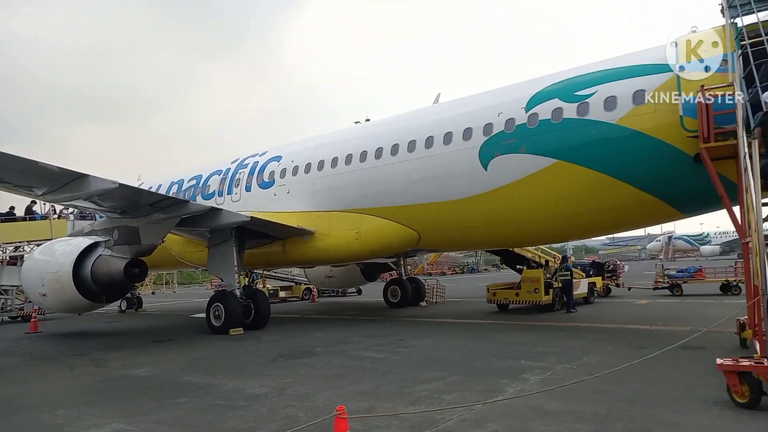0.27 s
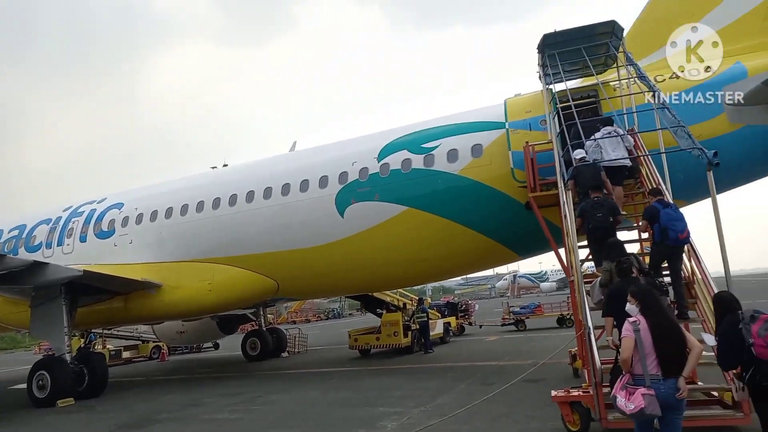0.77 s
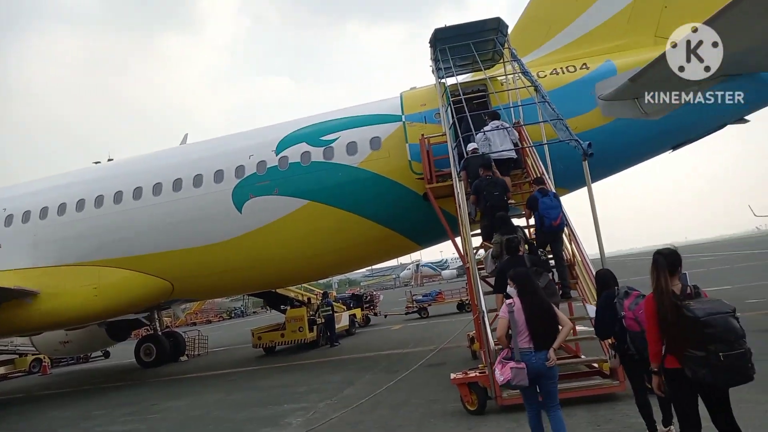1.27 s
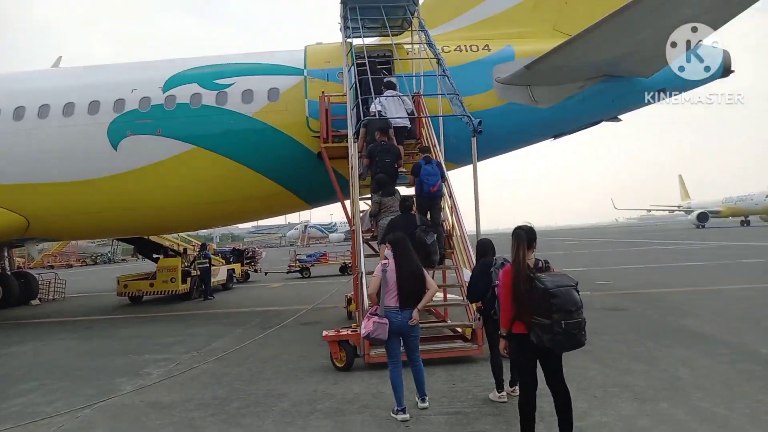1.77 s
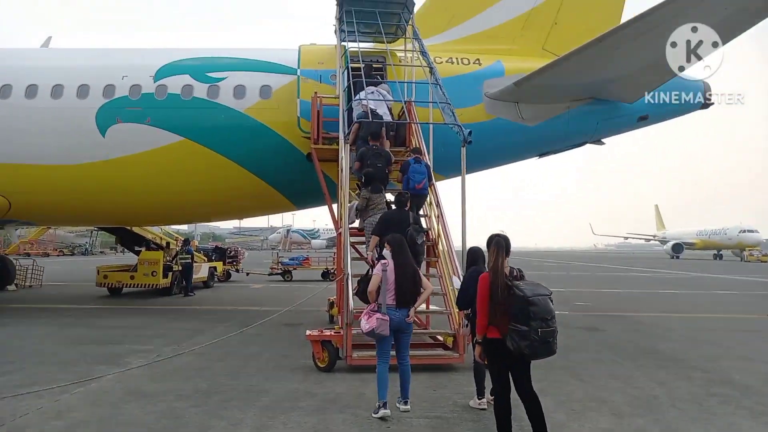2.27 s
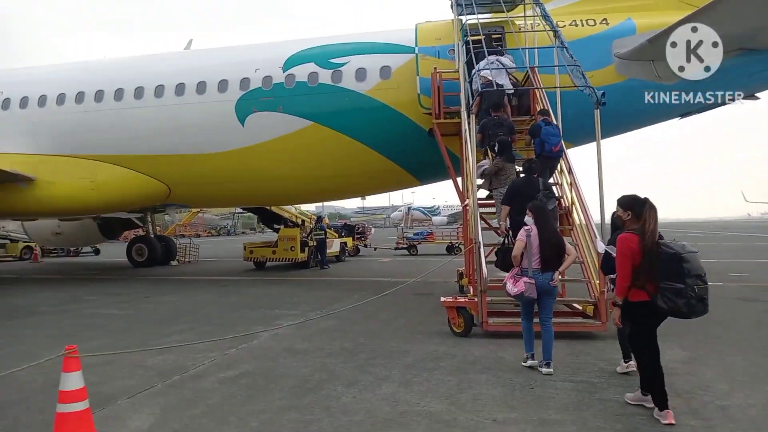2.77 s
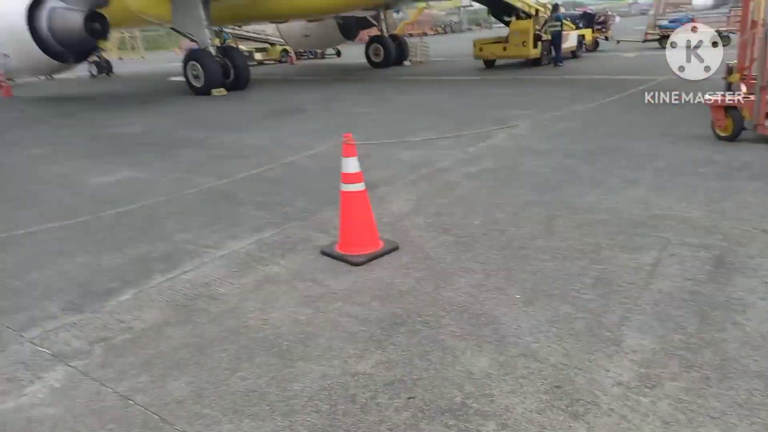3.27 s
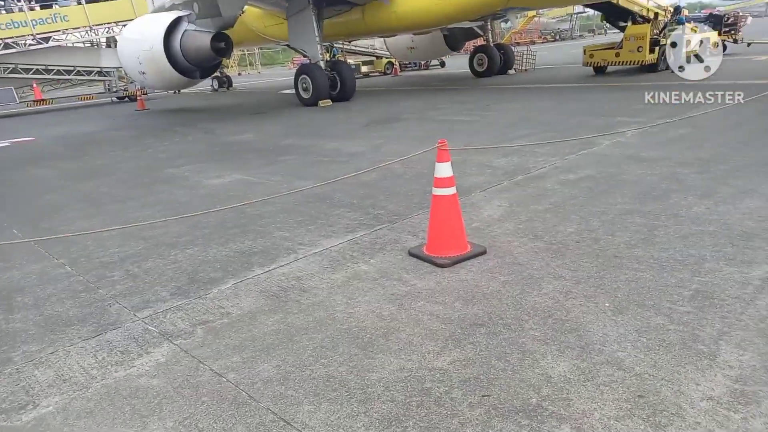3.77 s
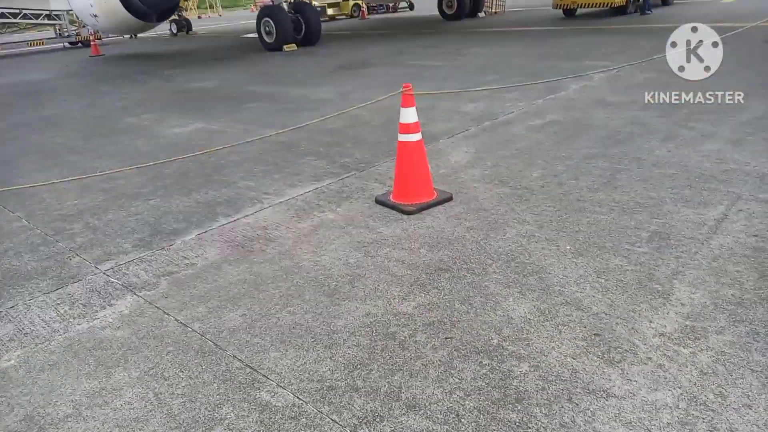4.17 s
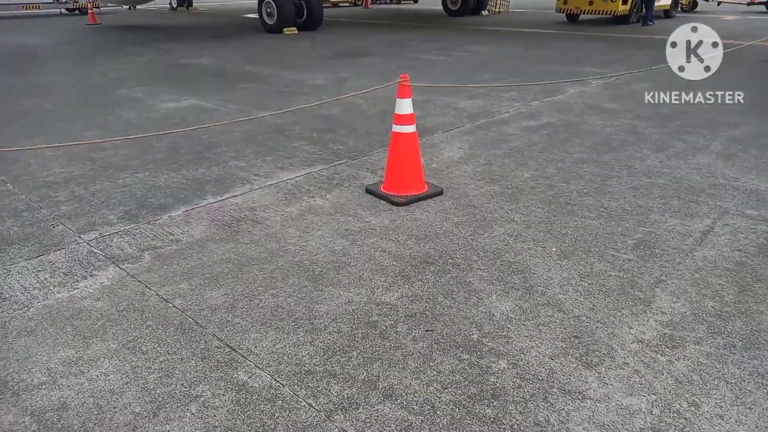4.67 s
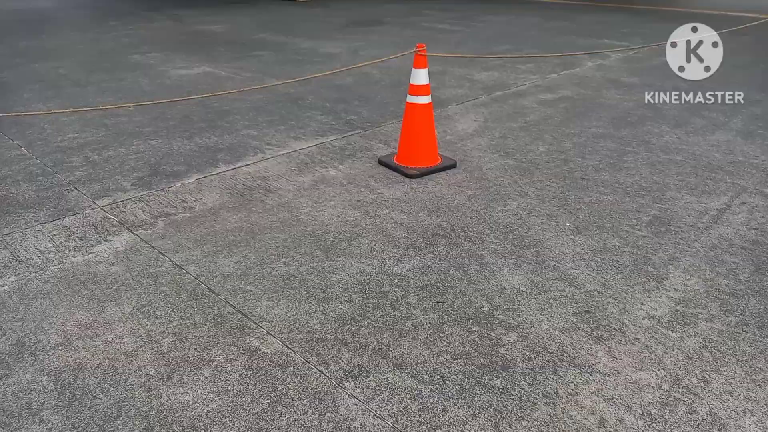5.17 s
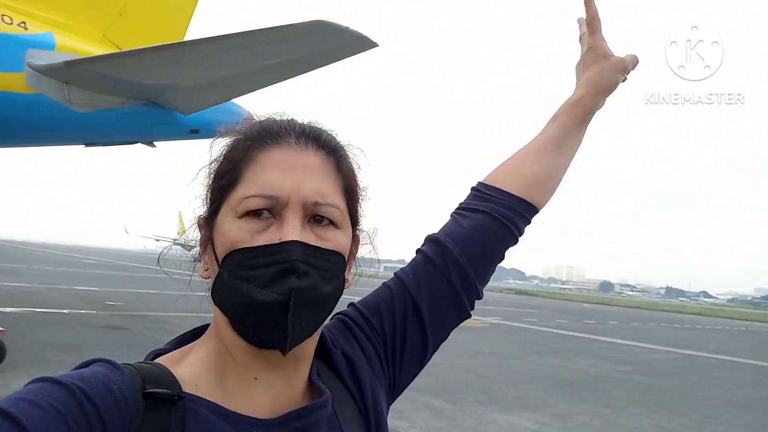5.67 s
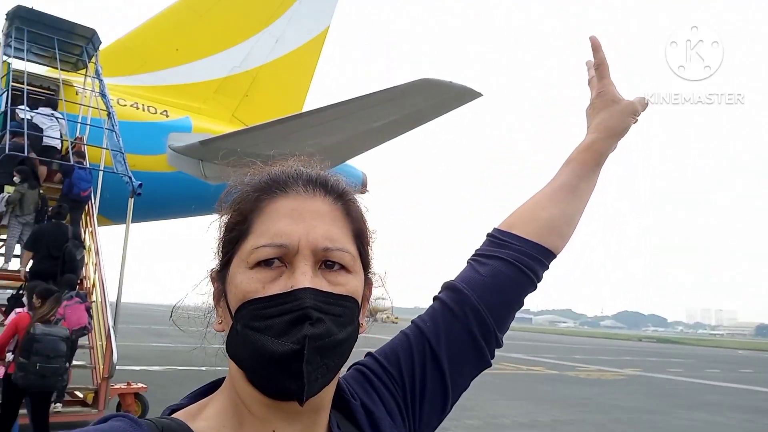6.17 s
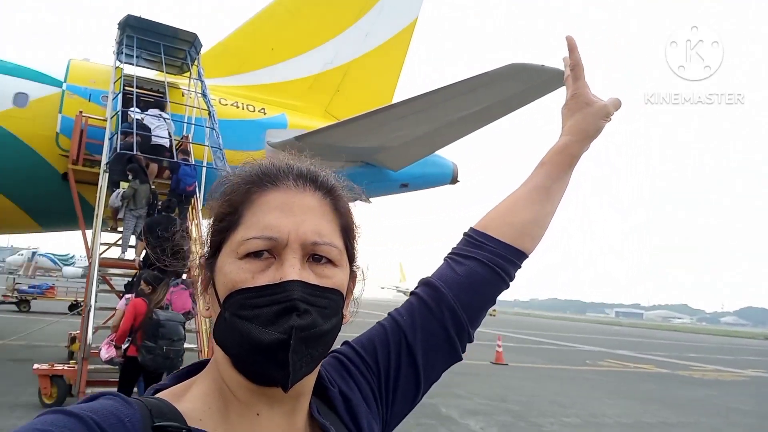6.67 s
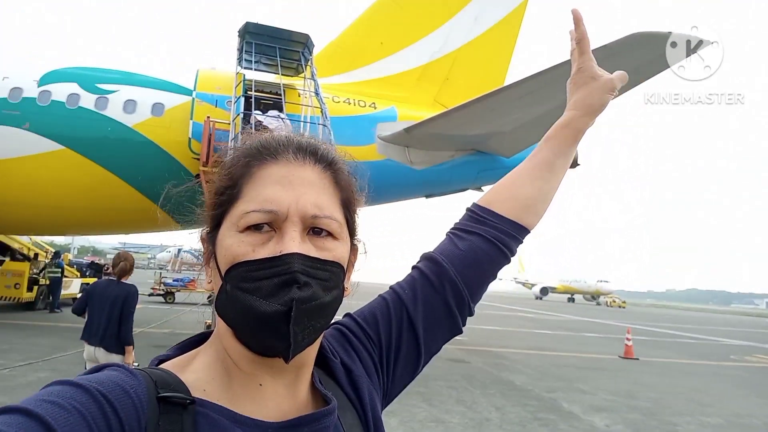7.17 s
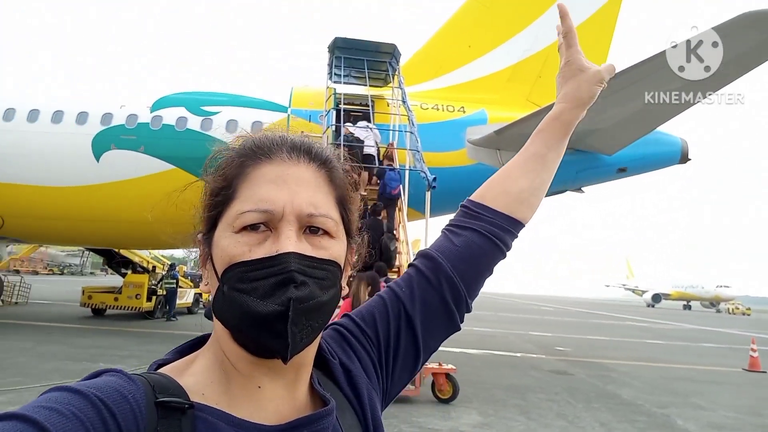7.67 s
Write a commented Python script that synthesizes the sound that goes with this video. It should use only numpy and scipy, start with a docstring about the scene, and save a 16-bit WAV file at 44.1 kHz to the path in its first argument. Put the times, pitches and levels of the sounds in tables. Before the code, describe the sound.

Outdoors on an airport apron, a handheld stereo microphone near a parked airliner's tail picks up a constant turbine roar: deep rumble, hollow exhaust rush, airy hiss and a very high whistle. Early wind gusts thump the left side. The vented air drops away as the camera tilts down, everything fades to silence for a moment, then the roar returns from the other side.

```python
"""A parked airliner's auxiliary turbine runs on an open apron, heard from a hand-held camera near the tail.
Filtered turbulence makes the combustion rumble, exhaust roar, hiss and vented air; listed gusts of random wind
noise buffet two ports. Lines broadened by random twinkling make a high compressor whistle, a fan's whine, shaft
orders, hums and low swells. Delays and balances move the sound between the ports as the camera turns.
It dips once, then fades out briefly and returns facing the other way."""
import sys
import numpy as np
from scipy import signal
from scipy.fft import rfft, irfft, next_fast_len
from scipy.io import wavfile
from scipy.ndimage import uniform_filter1d

SR = 44100
rng = np.random.default_rng(int(sys.argv[2]) if len(sys.argv) > 2 else 0)


def digitize_waveform(pressure):
    """Quantize a signal to 16-bit integers and store it at the path in sys.argv[1].

    Rows of a 2-D input are taken as channels; values are limited to [-1, 1].
    """
    field = np.atleast_2d(pressure).T
    bounded = np.clip(field, -1, 1)
    quanta = np.round(bounded * 32767).astype(np.int16)
    wavfile.write(sys.argv[1], SR, quanta)


N = 349272
TIME = np.arange(N) / SR


def gain_of(db):
    """Logarithmic level: decibels become an amplitude gain."""
    return 10 ** (np.asarray(db) / 20)


def evened(x):
    """Power normalisation: scales the whole signal to an rms of 1."""
    return x / np.sqrt(np.mean(abs(x) ** 2) + 1e-20)


def along(rows, t=TIME):
    """Linear interpolation: joins (time, value) rows by straight lines."""
    return np.interp(t, *np.transpose(rows))


def hump(peak_s, length_s):
    """Raised-cosine envelope: a smooth rise from 0 to 1 and back within the given length."""
    return np.cos(np.pi * np.clip((TIME - peak_s) / length_s, -.5, .5)) ** 2


def panned(balance_db):
    """Constant-power panning: left and right gains from the left-right balance."""
    pair = gain_of(np.array([[.5], [-.5]]) * balance_db)
    return pair / np.sqrt(np.mean(pair ** 2, axis=0))


# the camera swings from the aircraft down to the ground between the first two times, and faces round at the third
TILT_FROM_S, TILT_TO_S, TURN_S = 2.86, 3.69, 5.48


def poses():
    """Crossfade of viewpoints: shares of facing the aircraft, pointing down and turned round, over time."""
    tilt = along([(TILT_FROM_S, 0), (TILT_TO_S, 1)])
    turned = TIME >= TURN_S
    return np.array([(1 - tilt) * ~turned, tilt * ~turned, turned])


def by_pose(levels_db):
    """Directivity: blends a source's gains for the three poses over time."""
    return gain_of(levels_db) @ poses()


def drift(rate_hz):
    """Random modulation: low-passed complex noise of rms about 1, changing at about the given rate."""
    t = np.arange(0, N, 64) / SR
    f = np.fft.fftfreq(len(t), t[1])
    chance = rng.standard_normal(len(t)) + 1j * rng.standard_normal(len(t))
    slow = np.fft.ifft(chance / (1 + (f / rate_hz) ** 2) ** .7)
    return np.interp(TIME, t, evened(slow))


def tone(hz, width_hz, steady, lag_ms=0):
    """Scattering in hot air: a steady line plus a twinkling part that differs by port; the left can lag."""
    apart = np.clip(hz / 2500, 0, .8)  # short waves take more different paths
    own = np.array([drift(width_hz / 2), drift(width_hz / 2)])
    twinkle = np.sqrt(1 - apart) * drift(width_hz / 2) + np.sqrt(apart) * own
    strength = np.sqrt(steady) + np.sqrt(1 - steady) * twinkle  # steady is a share of power
    turns = np.cumsum(hz * np.ones(N)) / SR
    arrival = np.array([turns - hz * lag_ms / 1000, turns])
    return evened((strength * np.exp(2j * np.pi * arrival)).real)


def coloured(x, spectrum, resonances=()):
    """Spectral filtering: shapes noise on a log-frequency axis, adds resonances, and evens its power."""
    hz, db = np.transpose(spectrum)
    size = next_fast_len(N)
    f = np.fft.rfftfreq(size, 1 / SR)
    # silent outside the listed band
    shape_db = np.interp(np.log(f + 1), np.log(hz + 1), db, left=-np.inf, right=-np.inf)
    for centre_hz, width_hz, peak_db in resonances:
        shape_db = shape_db + peak_db / (1 + (2 * (f - centre_hz) / width_hz) ** 2)
    return evened(irfft(rfft(x, size) * gain_of(shape_db), size)[:, :N])


PORT_SPAN_MS = 0.34  # time sound takes from one port to the other
# Bearing of the turbine. Each row: time in seconds, delay of the left port in ms.
BEARING = [(0, 0.45), (1.2, 0.27), (2.2, 0.2), (2.8, 0.23), (3.6, 0.41), (5.45, 0.39), (5.5, -0.424),
           (6.2, -0.39), (7.2, -0.17), (7.9, -0.2)]


def rush(direct, patchy_db):
    """Diffuse-field coherence: turbulence from one bearing plus scatter from all round the apron."""
    size, hop = 1024, 256
    hz = np.fft.rfftfreq(size, 1 / SR)
    t = np.arange(N // hop + 5) * hop / SR
    grid = (3, len(t), len(hz))
    source, a, b = rng.standard_normal(grid) + 1j * rng.standard_normal(grid)
    lag_s = along(BEARING, t=t)[:, None] / 1000
    beam = np.array([source * np.exp(-2j * np.pi * hz * lag_s), source])
    alike = np.sinc(2 * hz * PORT_SPAN_MS / 1000)  # long waves reach both ports alike
    scatter = np.array([a, alike * a + np.sqrt(1 - alike ** 2) * b])
    field = np.sqrt(direct) * beam + np.sqrt(1 - direct) * scatter
    # moving hot air makes wide bands swell and sink together
    in_time = uniform_filter1d(rng.standard_normal(a.shape), size=16, axis=0)
    patches = uniform_filter1d(in_time, size=70, axis=1)
    field = field * gain_of(patchy_db * evened(patches))
    return signal.istft(field.transpose(0, 2, 1), nperseg=size, noverlap=size - hop)[1][:, :N]


# Combustion rumble spectrum. Each row: frequency in Hz, relative power density in dB.
RUMBLE = [(13, -61), (22, -27), (76, 1.5), (91, 0.5), (172, -6.5), (190, -7.5), (250, -22.5), (420, -120)]
# Rumble's relative levels: facing the aircraft in dB, pointing down in dB, turned round in dB.
RUMBLE_DB = (-29.5, -30, -27.5)
SWELL_DB, SWELL_HZ = -0.1, 1.5  # scale and rate of the random swelling


def rumble():
    """Combustion noise: low-frequency turbulence that swells and sinks slightly at random."""
    burning = coloured(rush(direct=0.53, patchy_db=-0.3), RUMBLE)
    swell = gain_of(SWELL_DB * drift(SWELL_HZ).real)
    return burning * swell * by_pose(RUMBLE_DB) * panned(-.6)


# Exhaust roar in the three poses. Each row: frequency in Hz, relative power density in dB.
ROAR_FACING = [(90, -20), (150, -4.5), (200, -2.5), (245, -4.5), (330, -0.5), (400, -2.5), (500, -2.5),
               (595, -10), (690, -10), (820, -6), (1030, -11), (1350, -10), (1550, -15.5), (2000, -18.5),
               (2700, -39.5)]
ROAR_DOWN = [(90, -23), (150, -3.5), (210, -0.5), (320, -1.5), (400, -2), (560, -4.5), (645, -8.5),
             (820, -9), (1100, -9.5), (1350, -8.5), (1650, -17), (2100, -22.5), (2800, -30)]
ROAR_BEHIND = [(90, 0), (150, -6), (220, -3), (345, 1), (430, -2), (510, -3), (630, -11), (820, -6),
               (950, -7.5), (1090, -12), (1220, -8.5), (1380, -9), (1470, -13.5), (1970, -16.5),
               (2200, -22), (2700, -26)]
# Narrow peaks and a notch of the exhaust pipe. Each row: frequency in Hz, width in Hz, change in dB.
PIPE = [(680, 31, 3.5), (1340, 29, 1.5), (1820, 62, -8.5), (1895, 100, 4)]
# Surges of the roar. Each row: peak time in seconds, length in seconds, boost in dB.
SURGES = [(4.01, .16, 1.5), (4.466, 0.17, 2.5), (6.785, 0.11, 1.5), (7.22, .14, 1)]
# Roar's relative levels: facing the aircraft in dB, pointing down in dB, turned round in dB.
ROAR_DB = (-24.5, -24, -22.5)


def roar():
    """Jet noise through a resonant pipe: turbulence whose colour depends on where the camera points."""
    jet = rush(direct=0.47, patchy_db=.5)
    views = zip(poses(), (ROAR_FACING, ROAR_DOWN, ROAR_BEHIND))
    blend = sum(share * coloured(jet, spectrum, PIPE) for share, spectrum in views)
    surge_db = sum(db * hump(peak_s, length_s) for peak_s, length_s, db in SURGES)
    return blend * gain_of(surge_db) * by_pose(ROAR_DB) * panned(-0.95)


# Broad hiss spectrum. Each row: frequency in Hz, relative power density in dB.
HISS = [(1300, -17), (1900, -2), (2900, 1.5), (3400, -1.5), (4900, -2), (5600, 0), (6600, -2),
        (7100, -10.5), (7500, -38), (8300, -7), (8900, -18), (9600, -11.5), (11000, -6.5), (15000, -5)]
# Course of the hiss. Each row: time in seconds, relative level in dB.
HISS_LEVEL = [(0, -30.5), (1.5, -31.5), (3.5, -30.5), (4.4, -28.5), (5.3, -30.5), (5.7, -34.5),
              (6.8, -32.5), (7.9, -29)]
# Left-right balance of the hiss: facing the aircraft in dB, pointing down in dB, turned round in dB.
HISS_BALANCE_DB = (-0.5, -.5, 2.5)
# Band shaded by the camera body, left port then right. Each row: frequency in Hz, width in Hz, change in dB.
PORT_SHADE = [(4300, 2000, -1), (7000, 1100, -6)]


def hiss():
    """Diffuse turbulence noise: fine hiss mostly from all round, with a band shaded at each port."""
    scatter = rush(direct=0.13, patchy_db=.7)
    shaded = [coloured(port[None], HISS, [shade]) for port, shade in zip(scatter, PORT_SHADE)]
    return np.vstack(shaded) * gain_of(along(HISS_LEVEL)) * panned(HISS_BALANCE_DB @ poses())


# Vented air before and after the camera turns. Each row: frequency in Hz, relative power density in dB.
VENT_FACING = [(900, -8.5), (1900, -11), (2700, -5), (3200, -5), (3800, 0.5), (5000, -0.5), (5500, 1.5),
               (5900, -9), (6500, -46), (7500, -47)]
VENT_BEHIND = [(900, -19), (1900, -9.5), (2400, -9), (2900, -8), (3350, -10), (3700, -1), (4300, -1.5),
               (4900, -4.5), (5500, -15.5), (6500, -35)]
# Vent's relative levels: facing the aircraft in dB, pointing down in dB, turned round in dB.
VENT_DB = (-24.5, -37, -25.5)
# Swelling as the camera pans across the vent's beam. Each row: time in seconds, change in dB.
VENT_SWELL = [(0, -0.5), (.65, 0.9), (1.1, -1.5), (2.0, 0), (2.75, 1), (3.05, 0), (3.3, 1), (3.6, -0.5),
              (4.4, -1), (5.3, -1.5), (5.55, -1), (5.85, -0.5), (6.45, 0), (6.8, -.5), (7.3, .3), (7.9, 0)]
VENT_PORTS_DB = [[-22], [0]]  # left and right: the beam strikes the right port


def vent():
    """Directional jet noise: a hiss of vented air that swells across its beam and strikes the right port."""
    jet = rush(direct=0.41, patchy_db=0.98)
    air = np.where(TIME < TURN_S, coloured(jet, VENT_FACING), coloured(jet, VENT_BEHIND))
    return air * by_pose(VENT_DB) * gain_of(along(VENT_SWELL)) * gain_of(VENT_PORTS_DB)


SHAFT_HZ = 813.38  # turbine shaft
# Whistle's skirt, spread by turbulence. Each row: frequency in Hz, relative power density in dB.
SKIRT = [(9000, -51), (10300, -36), (11100, -17), (11700, -17), (12300, -9), (12800, -2.5), (12950, 0.5),
         (13015, 3.5), (13090, -0.5), (13300, -4), (13800, -15.5), (14500, -25), (15200, -31), (15700, -31)]
# The uneven beam: the right port moves through it, the left is shaded.
# Each row: time in seconds, relative level in dB.
WHISTLE_RIGHT = [(0, -29), (.2, -28), (.4, -23), (.6, -22.5), (.8, -22), (1.0, -23), (1.65, -22),
                 (1.95, -22.5), (2.2, -20.5), (3.0, -24), (3.3, -31), (3.55, -24.5), (3.8, -25),
                 (4.2, -25.5), (4.45, -20), (4.78, -17), (5.3, -21), (6.0, -23), (6.4, -25), (7.2, -28.5),
                 (7.9, -25)]
WHISTLE_LEFT = [(0, -30.5), (1.7, -27), (3.4, -30.7), (4.5, -30), (6.7, -29), (7.9, -25.5)]
# hot air makes it flutter at both ports together and wander at each: scale and rate
FLUTTER_DB, FLUTTER_HZ = .7, 17
WANDER_DB, WANDER_HZ = .7, 2.3


def whistle():
    """Blade-passing tone of the compressor: a narrow core in a wide, fluttering skirt scattered from it."""
    blade_hz = 16 * SHAFT_HZ
    skirt = coloured(rush(direct=0.22, patchy_db=.7), SKIRT)
    core = gain_of(-9.5) * tone(blade_hz, width_hz=11, steady=.25)
    beams = (WHISTLE_LEFT, WHISTLE_RIGHT)
    ports_db = np.array([along(beam) + WANDER_DB * drift(WANDER_HZ).real for beam in beams])
    flutter_db = FLUTTER_DB * drift(FLUTTER_HZ).real
    return (skirt + core) * gain_of(ports_db + flutter_db - 1)


FAN_HZ = 2767.6  # cooling fan's blade tone
WAVER_HZ, WAVER_RATE_HZ = 2.2, 4  # rms depth and rate of its pitch wavering
# The whine meets its echo off the concrete and swells and fades differently at each port.
# Each row: time in seconds, relative level in dB.
WHINE_RIGHT = [(0, -41), (.15, -32), (.4, -33), (.73, -41), (.85, -30.5), (1.08, -32.5), (1.35, -45),
               (1.9, -37.5), (2.35, -36), (2.65, -33), (2.92, -36), (3.1, -38), (3.31, -26), (3.53, -44),
               (3.7, -31.5), (3.92, -40), (4.1, -51), (4.35, -40), (4.8, -50), (5.08, -35), (5.2, -52),
               (5.7, -51), (6.05, -36), (6.19, -51), (6.3, -36), (6.62, -38), (6.76, -56), (6.88, -38),
               (7.02, -51), (7.15, -33.5), (7.42, -36.5), (7.62, -50)]
WHINE_LEFT = [(0, -58), (.35, -40), (.8, -46), (1.06, -35), (1.35, -46), (1.65, -42), (2.1, -45),
              (2.63, -33.5), (2.95, -55), (3.2, -40), (3.6, -47), (3.8, -33), (4.2, -54), (6.15, -48),
              (6.35, -47), (6.65, -45), (6.76, -54), (6.88, -38), (7.1, -50)]
# Bearing of the fan and the turbine shaft. Each row: time in seconds, delay of the left port in ms.
FAN_BEARING = [(0, 0.32), (.4, 0.3), (.75, 0.15), (1.3, 0.12), (2.3, 0.015), (2.9, 0.14), (3.6, 0.33),
               (5.45, 0.26), (5.5, 0.14), (7.2, -0.028), (7.9, -0.05)]
# Relative levels of the smeared halo: facing the aircraft in dB, pointing down in dB, turned round in dB.
HALO_DB = (-43.5, -46, -44.5)
# Rise and fall of the second partial, one course for both ports.
# Each row: time in seconds, relative level in dB.
OCTAVE_LEVEL = [(0, -48), (.3, -40.5), (.45, -48), (.73, -36), (.92, -51), (1.22, -43), (1.58, -39),
                (1.9, -50), (2.25, -40.5), (2.45, -49), (2.63, -35), (2.9, -39), (3.1, -41), (3.5, -51),
                (4.1, -55), (4.4, -46), (4.8, -62), (6.2, -53), (7.35, -57), (7.6, -45), (7.9, -54)]
# Its left-right balance: facing the aircraft in dB, pointing down in dB, turned round in dB.
OCTAVE_BALANCE_DB = (-11, 2, -1)
# Relative levels of its halo: facing the aircraft in dB, pointing down in dB, turned round in dB.
OCTAVE_HALO_DB = (-39.5, -50, -49)


def whine():
    """Fan blade-passing harmonics: two wavering lines in faint halos, and a smeared third partial."""
    hz = FAN_HZ + WAVER_HZ * evened(drift(WAVER_RATE_HZ).real)
    line = tone(hz, width_hz=16, steady=.82, lag_ms=along(FAN_BEARING))
    line = line * gain_of([along(WHINE_LEFT), along(WHINE_RIGHT)])
    halo = tone(FAN_HZ - 12, width_hz=39, steady=0) * by_pose(HALO_DB) * panned(-5.5)
    octave = tone(2 * hz, width_hz=22, steady=.45)
    octave = octave * gain_of(along(OCTAVE_LEVEL)) * panned(OCTAVE_BALANCE_DB @ poses())
    octave_halo = tone(2 * FAN_HZ - 30, width_hz=170, steady=0) * by_pose(OCTAVE_HALO_DB) * panned(-8)
    octave_halo = octave_halo * gain_of(2 * along(VENT_SWELL))  # swells with the vent, twice as deeply in dB
    third = tone(3 * FAN_HZ, width_hz=70, steady=.03) * gain_of(-59)
    return line + halo + octave + octave_halo + third


# Orders of the turbine shaft. Each row: multiple of its frequency, relative level in dB,
# line width in Hz, steady share of power from 0 to 1.
SHAFT = [(1, -40.5, 7, .88), (2, -57, 6, .5), (8, -57, 14, .4), (18, -58, 20, .2)]
# Swelling of the hum as the camera moves. Each row: time in seconds, change in dB.
SHAFT_SWELL = [(0, 0), (1.2, 3), (1.45, 1.5), (2.0, 2), (2.8, -3), (3.55, -4), (3.9, 3), (4.2, -2),
               (4.6, 5), (5.0, -0.5), (5.9, -1), (6.9, 2.5), (7.9, 3)]
# Left-right balance of the hum: facing the aircraft in dB, pointing down in dB, turned round in dB.
SHAFT_BALANCE_DB = (-8, 0, 0)


def shaft():
    """Rotor orders: lines at whole multiples of the shaft frequency, which swell and fade together."""
    lag_ms = along(FAN_BEARING)
    orders = sum(tone(order * SHAFT_HZ, width_hz, steady, lag_ms) * gain_of(db)
                 for order, db, width_hz, steady in SHAFT)
    return orders * gain_of(along(SHAFT_SWELL)) * panned(SHAFT_BALANCE_DB @ poses())


# Faint line's relative levels: facing the aircraft in dB, pointing down in dB, turned round in dB.
FAINT_LINE_DB = (-48.5, -50, -53)


def faint_line():
    """Narrow-band noise: a faint, high, twinkling band near 9.4 kHz."""
    return tone(9410, width_hz=80, steady=.06) * by_pose(FAINT_LINE_DB)


# Hums of the equipment round the aircraft. Each row: frequency in Hz, relative level in dB,
# line width in Hz, steady share of power from 0 to 1, left-right balance in dB.
HUMS = [(40, -57, 1.97, .85, -1), (84.85, -35, 11.4, 0.3, 0), (401, -43.5, 13, 0.02, 8),
        (3880, -52.5, 16, 0.2, -8)]


def hums():
    """Tonal machinery noise: lines of fixed pitch, each with its own width and balance."""
    return sum(tone(hz, width_hz, steady) * gain_of(db) * panned(balance_db)
               for hz, db, width_hz, steady, balance_db in HUMS)


# Spectrum of the wind on the ports. Each row: frequency in Hz, relative power density in dB.
BUFFET = [(20, -35), (40, -26), (58, -11), (85, 2.5), (105, -4.5), (150, -15), (300, -28)]
# Gusts. Each row: peak time in seconds, length in seconds, relative level in dB, left-right balance in dB.
GUSTS = [(.63, 0.14, -26, -14), (1.05, .17, -19.8, -15), (1.18, 0.22, -22, -15), (1.378, 0.11, -23.5, -21),
         (1.493, 0.16, -21, -19), (2.248, .13, -25.5, -15), (5.75, .2, -33, -10), (6.692, .2, -31, -9)]
# Light draught's relative levels: facing the aircraft in dB, pointing down in dB, turned round in dB.
BREEZE_DB = (-35.5, -55, -39)


def breeze():
    """Wind pseudo-sound: independent buffeting of each port, by a light draught and gusts of even eddies."""
    gusts = sum(hump(peak_s, length_s) * gain_of(db) * panned(balance_db)
                for peak_s, length_s, db, balance_db in GUSTS)
    wind = coloured(rng.standard_normal((2, N)), BUFFET)
    local_power = abs(uniform_filter1d(wind ** 2, size=2200))  # over about 50 ms
    eddies = wind / np.sqrt(local_power + 1e-6)
    return eddies * np.hypot(by_pose(BREEZE_DB), gusts)


# Brief swells of the low rumble. Each row: peak time in seconds, relative level in dB.
LOW_SWELLS = [(.22, -24), (.51, -27), (1.02, -26), (1.5, -23), (1.93, -27), (2.12, -24.5), (2.6, -27),
              (2.77, -27.5), (3.17, -25), (3.43, -24.5), (4.25, -27), (4.46, -26.5), (4.67, -25),
              (5.75, -26), (6.4, -27), (6.69, -28), (6.87, -28), (7.24, -26), (7.56, -28), (7.74, -24.5),
              (7.85, -25)]
LOW_SWELL_HZ, LOW_SWELL_SPREAD_HZ, LOW_SWELL_S = 85.3, 6.06, .17  # mean pitch, rms spread and length


def low_swells():
    """Amplitude modulation: brief swells of the low rumble near 85 Hz, nearly alike at both ports."""
    hz = LOW_SWELL_HZ + LOW_SWELL_SPREAD_HZ * evened(drift(1 / LOW_SWELL_S).real)
    envelope = sum(hump(peak_s, LOW_SWELL_S) * gain_of(db) for peak_s, db in LOW_SWELLS)
    return tone(hz, width_hz=24, steady=.94) * envelope


FLARE_S, FLARE_LENGTH_S, FLARE_HZ, FLARE_DB = 2.2, 0.98, 1378, -39.5  # peak time, length, pitch, level


def flare():
    """Pipe resonance: a hollow ring of the exhaust pipe flares as the camera faces the tail."""
    return tone(FLARE_HZ, width_hz=70, steady=0) * hump(FLARE_S, FLARE_LENGTH_S) * gain_of(FLARE_DB)


# Spectrum of the hiss off the concrete. Each row: frequency in Hz, relative power density in dB.
GROUND = [(4500, -25), (6600, 4), (7400, -7), (8300, -5), (9000, -16), (10500, -7.5), (13000, 2),
          (14200, 4.5), (15500, 2)]
GROUND_DB, GROUND_FOCUS = -32.5, 8.5  # level, and how sharply it depends on the tilt (exponent)


def ground():
    """Ground reflection: treble off the concrete, mostly into the right port, as the camera points down."""
    down = poses()[1]
    bright = coloured(rng.standard_normal((2, N)), GROUND)
    return bright * gain_of(GROUND_DB) * down ** GROUND_FOCUS * panned(-10)


# Ring at the foot of the vent's band, lower as the camera comes round.
# Each row: time in seconds, pitch in Hz, relative level in dB.
RING = [(5.5, 3890, -69), (5.7, 3890, -39), (5.95, 3890, -35.5), (6.07, 3920, -47), (6.25, 3890, -38),
        (6.47, 3920, -32), (6.58, 3840, -43), (6.85, 3800, -38), (7.0, 3765, -32.5), (7.3, 3785, -31),
        (7.45, 3750, -33), (7.55, 3770, -43), (7.64, 3750, -30), (7.72, 3630, -35), (7.8, 3760, -44),
        (7.9, 3800, -35)]
# Strands of the ring. Each row: multiple of its pitch, relative level in dB, width in Hz.
RING_STRANDS = [(.95, -7, 80), (1, 1.5, 90), (1.06, -7, 120), (1.17, -9, 80)]


def vent_ring():
    """Flow-excited resonance: twinkling strands follow one moving pitch, chiefly at the right port."""
    ring_s, ring_hz, ring_db = np.transpose(RING)
    pitch = np.interp(TIME, ring_s, ring_hz)
    strands = sum(tone(multiple * pitch, width_hz, steady=0) * gain_of(db)
                  for multiple, db, width_hz in RING_STRANDS)
    return strands * gain_of(np.interp(TIME, ring_s, ring_db)) * gain_of(VENT_PORTS_DB)


def scene():
    """Linear superposition: the sounds of the whole apron add."""
    turbulence = rumble() + roar() + hiss() + vent()
    tones = whistle() + whine() + shaft() + faint_line() + hums()
    return turbulence + tones + breeze() + low_swells() + flare() + ground() + vent_ring()


# start and end of each even fade in seconds, and the level left in the gap
FADE_OUT_S, FADE_IN_S, GAP_DB = (5.337, 5.426), (5.529, 5.707), -97
DIP_S, DIP_LENGTH_S, DIP_DB = 3.83, 0.051, -5  # the level dips briefly: time, length, depth
EDGE_HZ = 15650  # upper band limit
# Overall level. Each row: time in seconds, gain in dB.
LEVEL = [(0, 1), (7.92, -.5)]


def record(dry):
    """Band limiting and gain: a low cut, a brief dip, the fade out and in, then a treble cut."""
    low_cut = signal.butter(6, 33, "highpass", fs=SR, output="sos")
    thinned = signal.sosfilt(low_cut, dry)
    fade = np.interp(TIME, FADE_OUT_S, (1, 0)) + np.interp(TIME, FADE_IN_S, (0, 1)) + gain_of(GAP_DB)
    level_db = along(LEVEL) + DIP_DB * hump(DIP_S, DIP_LENGTH_S)
    treble_cut = signal.firwin(511, EDGE_HZ, window=("kaiser", 9), fs=SR)
    return signal.oaconvolve(thinned * fade * gain_of(level_db), treble_cut[None], "same")


dry = scene()
out = record(dry)
digitize_waveform(out)
```